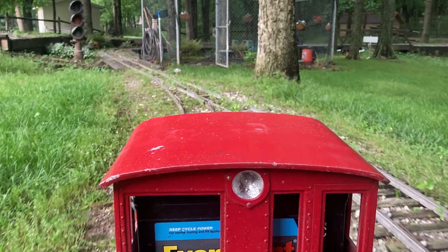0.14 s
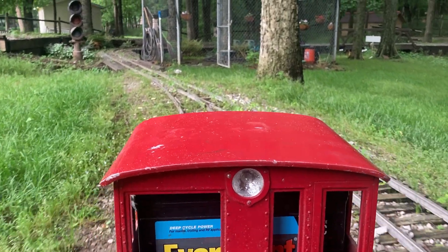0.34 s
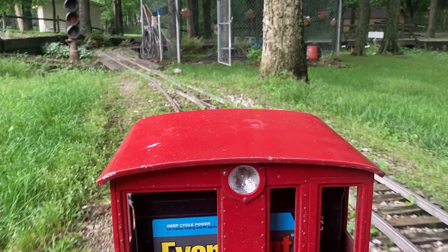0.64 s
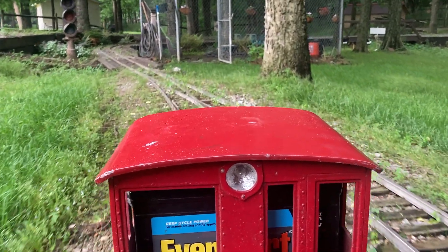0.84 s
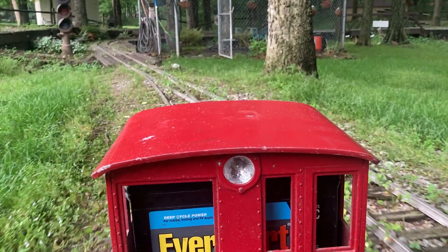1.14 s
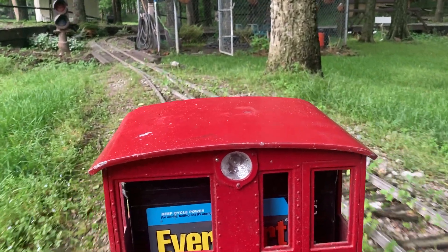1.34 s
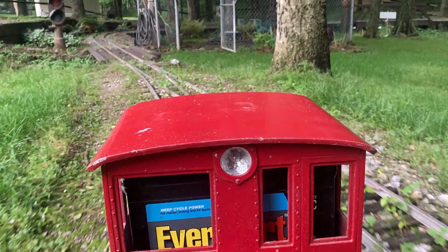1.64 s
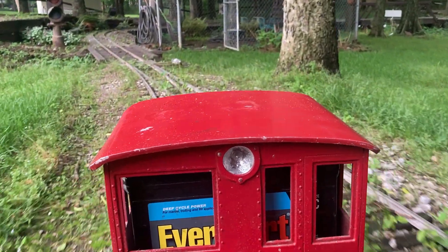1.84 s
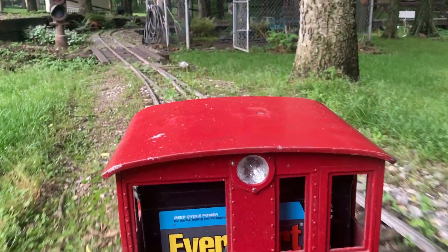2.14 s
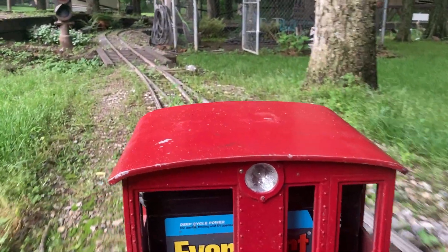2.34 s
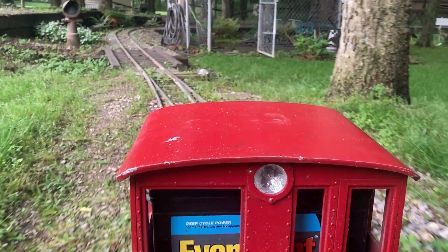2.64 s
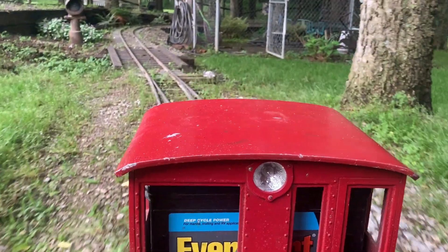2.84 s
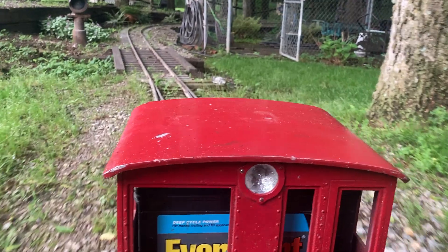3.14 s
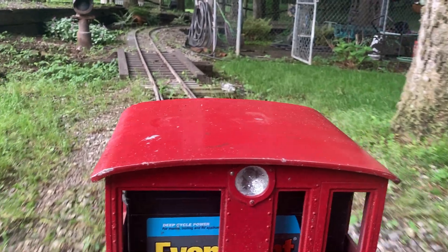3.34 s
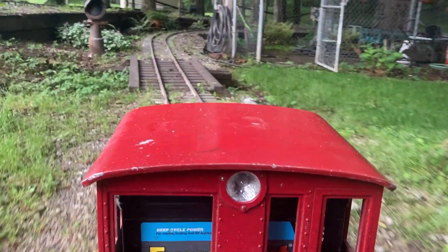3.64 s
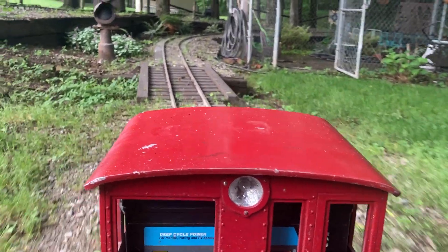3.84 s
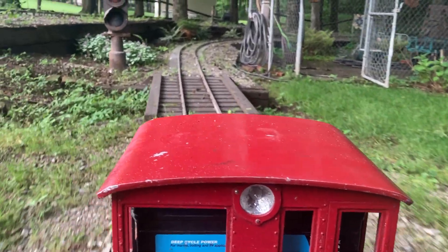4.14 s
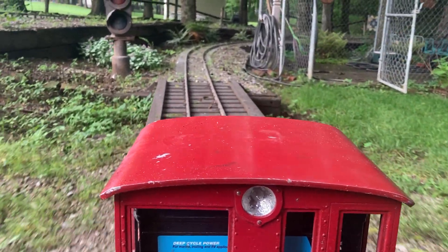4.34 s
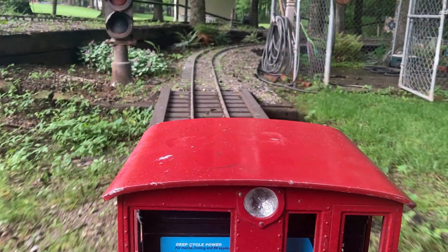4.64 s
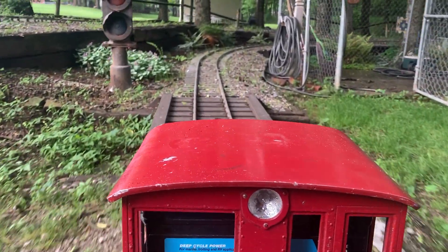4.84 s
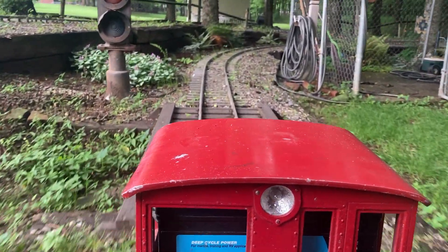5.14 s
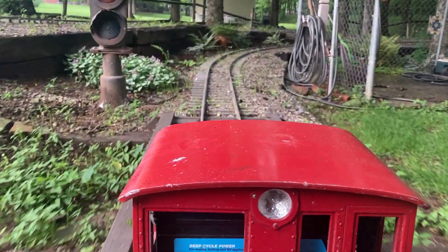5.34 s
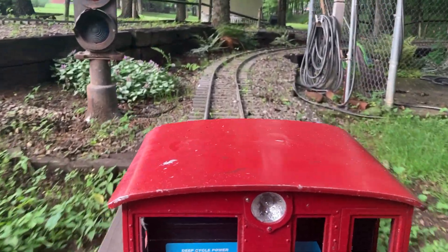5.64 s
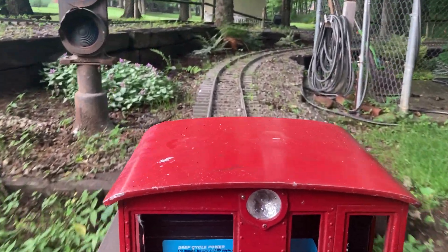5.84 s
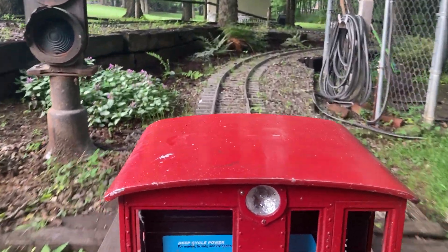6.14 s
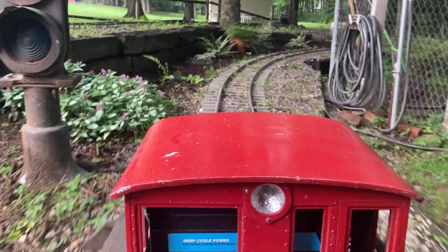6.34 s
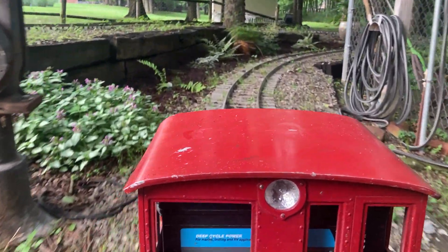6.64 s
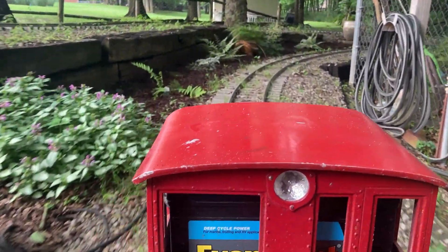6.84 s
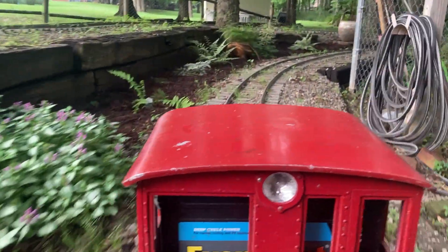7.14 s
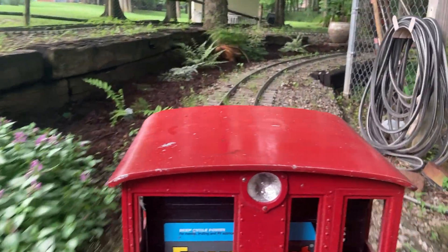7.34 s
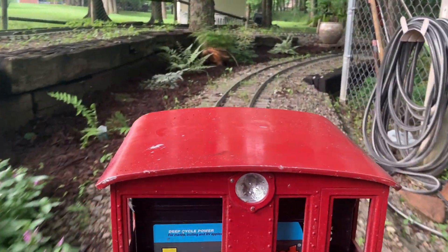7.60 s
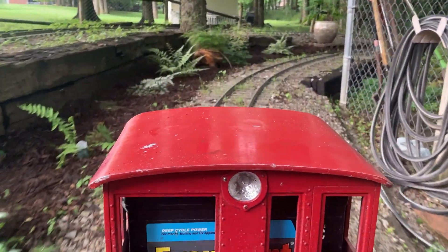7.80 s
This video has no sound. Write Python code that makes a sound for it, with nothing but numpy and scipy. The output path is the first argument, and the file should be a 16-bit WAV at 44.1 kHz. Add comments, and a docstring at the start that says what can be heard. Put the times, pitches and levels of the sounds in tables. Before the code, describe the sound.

A small electric ride-on train gathers speed with rising motor whine, gritty wheel rumble and ticking flanges, then coasts with drumming thuds over a wooden bridge.

```python
"""A rolling rumble and a rising motor whine open the scene: a small battery ride-on locomotive gathers speed.
We ride just behind its cab on narrow rails. Random wheel contacts shake the chassis, cab and rails;
sine orders of the gear mesh make the whine, until the power is cut. Noise bursts crack as grit and tap
as flanges, and decaying sines knock as loose fittings. At last the train coasts over a short wooden
bridge, whose deck drums and booms as noise swinging around the pitch of each mode."""
import sys
import numpy as np
from scipy import signal
from scipy.fft import rfft, irfft, next_fast_len
from scipy.io import wavfile
from scipy.ndimage import uniform_filter1d, minimum_filter1d, map_coordinates

SR = 44100
rng = np.random.default_rng(int(sys.argv[2]) if len(sys.argv) > 2 else 0)


def materialize(psi):
    """Save the field psi as 16-bit PCM at rate SR to the path in sys.argv[1].

    A 1-D psi becomes a single channel; in a 2-D psi each row is a channel.
    """
    bounded = np.clip(np.atleast_2d(psi).T, -1, 1)
    quanta = np.round(bounded * 32767).astype(np.int16)
    wavfile.write(sys.argv[1], SR, quanta)


N = 351477  # length of the scene in samples

# How the sheet-metal cab colours a sound. Each row: frequency in Hz, relative strength in dB.
CAB = [(550, -29.5), (870, -9.5), (980, 2.5), (1090, -7.5), (1250, 3.5), (1350, -0.5), (1450, -2),
       (1570, -0.5), (1690, 2), (1830, -15), (2100, -14.5), (2800, -61.5)]

POWER_OFF_S, COAST_HZ_PER_S = 4.96, 23.5  # when the motor stops; how fast the mesh rate then sinks
CRUISE_HZ = 230  # gear mesh rate at cruising speed


def rolling():
    """Rough wheels shake the chassis, rattle the cab panels and hiss on the rail."""
    # How the chassis and track colour the rumble. Each row: frequency in Hz, relative strength in dB.
    body_spectrum = [(22, -33), (62, -13), (125, -11.5), (185, -3.5), (220, 1.03), (265, -3), (320, 1.5),
                     (400, 0.24), (480, -2), (570, -11.5), (650, -7), (780, -16), (950, -21.5),
                     (1150, -75.5)]
    # How the wheel tread sounds on the rail. Each row: frequency in Hz, relative strength in dB.
    rail_spectrum = [(1200, -53), (1750, 3), (2000, 1), (2250, 4), (2550, 1.5), (3150, 0), (3800, -9.5),
                     (5000, -13), (5700, -21.5), (6650, -14.5), (7700, -22.5), (8700, -34.5), (10000, -60),
                     (12000, -58)]
    rumble_db, panels_db, hiss_db = ride()
    rattle = wobble(45)  # the load on the wheels flutters
    body_force = contacts(rate=900, spread_db=1.5, smooth=0.99)
    cab_force = contacts(rate=600, spread_db=3.5, smooth=1.0)
    rail_force = steel(contacts(rate=1100, spread_db=7.5, smooth=1.4))
    body = unit(ports(ring_through(body_force, body_spectrum)))
    cab = unit(ports(ring_through(cab_force, CAB)))
    rail = unit(ports(ring_through(rail_force, rail_spectrum)))
    return (body * amp(rumble_db + 0.76 * rattle)
            + cab * amp(panels_db + 1.5 * rattle)
            + rail * amp(hiss_db + 2.0 * rattle + 0.26 * wobble(19)))


def gears(shimmer_db=1.0, fade_s=0.051):
    """Orders of the gear mesh climb with speed, swell in each body resonance and fade when the power is cut."""
    # Body resonances that the orders climb through.
    # Each row: multiple of the mesh rate, resonance in Hz, width in Hz, level in dB.
    gear_swells = [(2, 246, 10, -26), (2, 335, 13, -23), (2, 402, 10, -32), (2, 436, 9, -26),
                   (2, 471, 20, -24.7), (3, 415, 20, -36), (3, 462, 18, -30), (3, 520, 16, -40),
                   (3, 585, 16, -36), (4, 650, 12, -27.5), (6, 1005, 24, -45), (7, 1015, 20, -43.5)]
    mesh_hz = speed()
    uneven_hz = mesh_hz * (1 + .0015 * wobble(22))
    phase = 2 * np.pi * np.cumsum(uneven_hz) / SR
    load_db = 1.7 * (mesh_hz / CRUISE_HZ) ** 2 * wobble(9)  # the level wavers more at speed
    whine = 0
    for k, hz, width, db in gear_swells:
        swell = 1 / (1 + ((k * mesh_hz - hz) / width) ** 2)
        level = amp(db + load_db + shimmer_db * wobble(25))
        whine = whine + swell * level * np.sqrt(2) * np.sin(k * phase)
    fade = np.exp(-since(POWER_OFF_S) / fade_s)
    return ports(np.array([whine * fade, np.zeros(N)]))


def bridge(width_hz=75, boom_width_hz=60):
    """The timber deck drums in a main mode that sags under each load, and booms in its hollow ones."""
    # Engine and cars load the deck in turn.
    # Each row: start in seconds, length in seconds, starting level in dB, swell in dB per second.
    loads = [(5.761, 0.76, -20, 7), (6.596, 0.4, -17, 1), (7.03, .94, -19, -10)]
    # The hollow span booms as a truck crosses a beam.
    # Each row: start in seconds, pitch in Hz, level in dB, time to fall by 60 dB in seconds.
    booms = [(5.982, 635, -27, 1.7), (6.17, 632.7, -21.5, 2.9), (6.521, 235, -16.5, 1.7),
             (6.68, 644.6, -19.5, 0.8), (6.78, 537.5, -22, .7), (7.19, 682, -23.5, 0.45),
             (7.229, 233.6, -24, 0.55)]
    load_attack_s, load_release_s, boom_attack_s = 0.074, 0.1, 0.04
    deck_hz, sag_hz_per_s = 395.4, 85  # the main mode sinks as a load moves toward mid-span
    drumming, booming = 0, 0
    for s, length, db, swell_db in loads:
        on_deck_s = np.minimum(since(s), length)
        load = amp(db + swell_db * on_deck_s) * gate(s, length, load_attack_s, load_release_s)
        drumming = drumming + load * resonance(deck_hz - sag_hz_per_s * on_deck_s, width_hz)
    for s, hz, db, t60 in booms:
        rise = np.minimum(since(s) / boom_attack_s, 1)
        envelope = amp(db - 60 * since(s + boom_attack_s) / t60) * rise
        booming = booming + envelope * resonance(np.full(N, hz), boom_width_hz)
    return ports(np.array([drumming + booming, np.zeros(N)]))


def joints(swell_s=0.0099):
    """A wheel dropping into a rail gap or onto a bridge tie gives one dull, rounded thud."""
    # Each row: start in seconds, level in dB, pitch in Hz.
    drops = [(.317, -16, 360), (2.823, -9, 340), (3.534, -11, 350), (5.989, -8, 365), (6.069, -7.5, 370),
             (6.103, -8, 405), (6.206, -3.5, 355), (6.246, -5.5, 355), (6.323, -4, 350), (6.398, -3.5, 320),
             (6.482, -9, 320), (6.52, -7, 370), (6.575, -12, 440), (6.687, -9.5, 405), (6.722, -10, 415),
             (6.76, -7, 420), (6.8, -11, 430), (6.836, -6.5, 320), (6.874, -8, 390), (6.895, -4.5, 360),
             (6.943, -5.5, 380), (6.985, -6, 395), (7.072, -15, 390), (7.156, -13, 350)]
    out, t = np.zeros((2, N)), np.arange(SR // 8) / SR
    envelope = (t / swell_s * np.exp(1 - t / swell_s)) ** 2  # rises to 1 at swell_s, then dies away
    for s, db, hz in drops:
        add(out[0], s, amp(db) * envelope * np.sin(2 * np.pi * hz * t))
    return ports(out)


def knocks(ping_db=1):
    """A loose fitting knocks to and fro as the train rocks, in changing modes; pebbles ping off the wheels."""
    # Each row: start in seconds, level in dB, then tints in dB for the lowest three modes, the fourth,
    # the next two and the top two, and last the level of the crack in dB relative to the knock.
    blows = [(5.378, -22, 2, -12, -14, -15, -26), (5.3993, -21, -14, -8, 0, -14, -23),
             (5.435, -9.5, -6, 4, 9, 2, -14.5), (5.5154, -22, -4, -3, -10, 7, -26),
             (5.559, -25, -2, 0, 12, -10, -7), (5.563, -19, -2, 0, 13, -12, -10),
             (5.572, -22, 2, -12, -14, -15, -20), (6.5692, -19, -17.5, -6, 1, -15, -23),
             (6.618, -9.5, -6.5, 7, -10, 1, -25), (7.5137, -22.5, -20, -4, 1, -20, -19),
             (7.554, -17.5, -12, 2, -8, -12, -22)]
    # Modes of the loose fitting. Each row: pitch in Hz, level in dB, time to fall by 60 dB in seconds.
    fitting_modes = [(1350, 2, 0.025), (1655, 18, 0.033), (1850, 3, 0.018), (2200, -3, 0.024),
                     (2400, 2, 0.024), (2620, -6, 0.025), (4300, -9, 0.025), (8200, -25, 0.02)]
    # Pebbles hitting the wheel. Each row: start in seconds, level in dB.
    pings = [(5.738, -27.5), (7.443, -34.5)]
    # Modes heard in a ping. Each row: pitch in Hz, level in dB, time to fall by 60 dB in seconds.
    pebble_modes = [(3330, 3.5, 0.024), (3650, 0, 0.015), (8300, -17.5, 0.012), (8930, -11.5, 0.015),
                    (9650, -16.5, 0.014)]
    # Contact noise of a knock. Each row: frequency in Hz, relative strength in dB.
    crack_spectrum = [(700, -9), (1300, -1), (1800, 2), (2600, 1.5), (3400, -19), (4400, -6.5), (5600, -20),
                      (8200, -24), (12000, -39.5)]
    out, cracks = np.zeros((2, N)), np.zeros((2, N))
    for s, db, low_db, fourth_db, middle_db, high_db, crack_db in blows:
        tint_db = np.array([low_db] * 3 + [fourth_db] + [middle_db] * 2 + [high_db] * 2)
        add(out, s, amp(db + 1.5) * struck(fitting_modes, tint_db, attack_s=.0014, lag_s=.00002))
        add(cracks, s, amp(db + crack_db + 3) * burst(t60=.045))
    for s, db in pings:
        add(out, s, amp(db + ping_db) * struck(pebble_modes, 0, attack_s=0.00066, lag_s=.00001))
    return out + ports(ring_through(cracks, crack_spectrum))


def grit(again_s=0.024, again_db=-12, rate=14, small_db=-6.0):
    """Stones crack under the wheels, then crumble once more; small ones keep ticking, rate a second."""
    # The larger stones. Each row: start in seconds, level in dB.
    large = [(.3193, -35), (.3408, -35), (.7818, -33), (1.2841, -32), (1.3934, -30), (1.6648, -30),
             (1.6963, -32), (1.7655, -30), (1.955, -28), (2.2719, -29), (2.289, -28), (2.5912, -29),
             (2.6066, -26), (3.0615, -29), (3.2276, -25), (3.3487, -30), (3.6266, -30), (3.6711, -24),
             (3.762, -28), (3.8313, -26), (3.8856, -24), (3.9395, -25), (3.9658, -28), (3.9844, -27),
             (4.0232, -28), (4.2578, -27), (4.3596, -29), (4.4, -29), (4.5216, -30), (4.6233, -29),
             (4.8539, -28), (4.9133, -27), (5.1343, -23), (5.2494, -28), (5.3741, -27), (7.0226, -33),
             (7.527, -33), (7.576, -30), (7.771, -36), (7.9186, -28)]
    # How crushed grit sounds. Each row: frequency in Hz, relative strength in dB.
    stone_spectrum = [(900, -29.5), (1600, -1.5), (2300, 11), (3300, 2), (5000, -7), (5700, -17.5),
                      (6800, -12), (8500, -27), (11000, -50.5)]
    force, hiss_db = np.zeros((2, N)), ride()[2]
    small = []
    for place, size in rng.random((round(rate * N / SR), 2)):
        level_db = hiss_db[int(place * N)] + small_db + 4 * size  # ticks follow the rail hiss
        small.append((place * N / SR, level_db))
    for s, db in list(large) + small:
        add(force, s, amp(db + 1.5) * snap())
        add(force, s + again_s * (.5 + rng.random()), amp(db + again_db) * snap())
    return ports(ring_through(steel(force), stone_spectrum))


def flanges(gap_s=.014, uneven=.5, size_db=2.0, graze_db=-58):
    """The flanges chatter on the rail side in uneven taps that ring the wheel; the hardest stand out."""
    # Scrapes along the rail side. Each row: start in seconds, length in seconds, level in dB.
    scrapes = [(.58, .85, -57), (1.51, .54, -43.5), (2.9, 2.5, -50), (7.46, .5, -54)]
    # Single hard taps on the rail. Each row: start in seconds, level in dB.
    hard_taps = [(.4316, -32), (1.0133, -36), (1.12, -29), (1.4118, -31), (1.5126, -28), (1.5255, -31),
                 (1.5889, -31), (1.6179, -32), (1.7266, -31), (1.7655, -28), (1.812, -33), (1.8464, -30),
                 (1.8758, -30), (1.9541, -28), (1.9781, -32), (2.0055, -31), (2.039, -33), (2.0709, -32),
                 (2.0843, -28), (2.1472, -33), (2.1901, -31), (7.919, -24)]
    # A steel wheel struck at its flange. Each row: frequency in Hz, relative strength in dB.
    wheel_spectrum = [(1300, -8.5), (1900, 6.5), (2200, 12), (2550, 5.5), (3000, 2), (3350, -1), (3700, -3),
                      (4500, -21.5), (5700, -20.5), (7000, -20), (10000, -45)]
    attack_s, release_s = 0.017, 0.08
    pressure = amp(graze_db)  # a light graze never stops
    for s, length, db in scrapes:
        pressure = pressure + amp(db) * gate(s, length, attack_s, release_s)
    chatter, taps = np.zeros((2, N)), np.zeros((2, N))
    gaps, sizes = np.clip(rng.standard_normal(size=(900, 2)), -2, 2).T
    times = np.cumsum(gap_s * np.exp(uneven * gaps))
    for s, size in zip(times, sizes):
        add(chatter, s, amp(size_db * size) * snap())
    for s, db in hard_taps:
        add(taps, s, amp(db) * snap())
    scraping = unit(ports(ring_through(steel(chatter), wheel_spectrum)))
    return pressure * scraping + ports(ring_through(steel(taps), wheel_spectrum))


def jolts():
    """A bump in the track throws the cab panels against their frame."""
    # Each row: start in seconds, level in dB.
    bumps = [(.321, -33), (3.319, -31.5), (3.535, -29.5), (4.024, -29), (4.518, -27.5), (4.887, -25.5),
             (4.92, -26.5), (5.135, -27), (5.826, -31), (7.85, -36)]
    force = np.zeros((2, N))
    for s, db in bumps:
        add(force, s, amp(db) * snap())
    return ports(ring_through(force, CAB))


def sand(attack_s=0.02, release_s=0.016):
    """Each patch of sand on the rail is ground into a bright, dense crackle."""
    # Each row: start in seconds, length in seconds, level in dB.
    sand_patches = [(1.52, 0.06, -54.5), (2.55, .1, -53), (4.35, 0.08, -44.5), (5.115, 0.03, -45.5),
                    (5.235, .025, -45.5), (5.35, 0.03, -48), (5.78, .55, -51.5), (6.34, .1, -43.5),
                    (6.45, 0.097, -48.5), (7.47, 0.021, -43.5), (7.52, .065, -48.5)]
    # How fine ground sand sounds. Each row: frequency in Hz, relative strength in dB.
    sand_spectrum = [(1800, -28), (3000, 2.5), (4200, 1), (5100, -0.5), (5700, -12), (6900, -4.5),
                     (8000, -12.5), (9000, -25.5), (11000, -45)]
    patches = sum(amp(db) * gate(s, length, attack_s, release_s) for s, length, db in sand_patches)
    crackle = ring_through(contacts(rate=2200, spread_db=6, smooth=0.56), sand_spectrum)
    return patches * unit(ports(crackle))


def speed():
    """Gear mesh rate in Hz: it climbs under power and sinks while coasting."""
    # The climb under power. Each row: time in seconds, mesh rate in Hz.
    climb = [(0, 114), (.2, 123), (.45, 134.5), (.75, 147.7), (1.0, 156.3), (1.15, 159.3), (1.35, 163.2),
             (1.55, 170.3), (2.2, 195), (2.95, 217), (3.15, 222.3), (3.9, 231.5), (4.1, 233.7),
             (4.35, 234.9), (4.9, 240.7)]
    return curves(climb)[0] - COAST_HZ_PER_S * since(POWER_OFF_S)


def ride():
    """Levels in dB of rumble, cab rattle and rail hiss: all grow with speed and change with the rail."""
    # Rougher or smoother stretches of rail.
    # Each row: start in seconds, length in seconds, extra rumble in dB, extra hiss in dB.
    stretches = [(0.352, 1.1, -2, -1), (1.482, 0.46, -.5, 1), (2.07, 0.32, -1, -0.5), (2.787, 2.68, 1.6, 3),
                 (3.397, 0.28, 2, 0.3), (5.766, .73, 1, 7), (6.332, 0.13, 1.5, 2), (6.896, 0.51, -3, -2.5),
                 (7.435, 0.47, -1.5, 0)]
    edge_s = 0.051  # time to run onto or off a stretch
    panel_share = 0.56  # share of the extra hiss, in dB, that the cab takes up
    doublings = np.log2(speed() / CRUISE_HZ)
    bumpy, coarse = sum(np.outer(extra_db, gate(s, length, edge_s, edge_s))
                        for s, length, *extra_db in stretches)
    # level at cruising speed, growth per doubling of speed, extra from the rail
    return (-20 + 4 * doublings + bumpy,
            -35 + 5 * doublings + panel_share * coarse,
            -45 + 9 * doublings + coarse)


def contacts(rate, spread_db, smooth):
    """Force of a rough tread: tiny random impacts, rate a second, on top of even friction noise."""
    hits = rng.random(N) < rate / SR
    sizes = amp(spread_db * np.minimum(rng.exponential(size=N), 3))
    impacts = hits * sizes * rng.uniform(-1.03, 1, (2, N))
    return unit(impacts) + smooth * unit(rng.standard_normal((2, N)))


def steel(x, count=3):
    """Wheels and rails add a brief ring of close modes, which change as the contact point travels."""
    t = np.arange(SR // 25) / SR
    tails = rng.standard_normal((count, len(t))) * amp(-60 * t / .035)  # noise tails, 60 dB down in 35 ms
    shares = np.array([wobble(5) for _ in tails])
    shares /= np.linalg.norm(shares, axis=0)
    ringing = 0
    for share, tail in zip(shares, tails):
        ring = signal.oaconvolve(x, tail[None] / np.linalg.norm(tail), axes=1)[:, :N]
        ringing = ringing + share * ring
    return .85 * x + .5 * ringing


def resonance(centre_hz, width_hz):
    """A broad mode shaken at random, rms 1; heavy timber gives less as it swings wider."""
    # How well the timber radiates. Each row: frequency in Hz, relative strength in dB.
    deck_spectrum = [(60, -44.5), (150, -24), (230, -8.5), (340, 2), (450, 0.5), (600, 3), (800, -3.5),
                     (1100, -32), (1800, -48)]
    noise = rng.standard_normal((2, N))
    sway = filtered(noise, lambda hz: 1 / (1 + 1j * hz / width_hz) ** 1.61)
    swing = np.tanh(0.4 * sway / sway.std())
    phase = 2 * np.pi * np.cumsum(centre_hz) / SR
    boom = swing[0] * np.cos(phase) + swing[1] * np.sin(phase)
    return unit(filtered(boom, lambda hz: amp(along(deck_spectrum, hz)[0])))


def struck(modes, tint_db, attack_s, lag_s):
    """One blow on a small part, its modes tinted; the right microphone hears it lag_s later."""
    t = np.maximum(np.arange(SR // 8) / SR - np.array([[0], [lag_s]]), 0)
    hz, db, t60 = np.transpose(modes)
    db = db + tint_db + rng.standard_normal(len(db))  # no two blows are quite alike
    ring = sum(amp(d - 60 * t / life) * np.sin(2 * np.pi * f * t) for f, d, life in zip(hz, db, t60))
    ring = ring * (1 - np.exp(-(t / attack_s) ** 2))
    return ring / np.abs(ring.mean(0)).max()


def burst(t60):
    """A short crunch of contact force on two unrelated channels, falling 60 dB in t60 seconds."""
    t = np.arange(SR // 8) / SR
    return amp(-60 * t / t60) * rng.standard_normal((2, len(t)))


def snap():
    """A hard contact: a sharp, short break on top of a weaker, longer crunch."""
    return 1.5 * burst(t60=.011) + .6 * burst(t60=.05)


def ring_through(x, spectrum, size=4096):
    """Pass x through a body with this spectrum, which answers a blow at once and never ahead of it."""
    gain_db, = along(spectrum, np.fft.rfftfreq(size, 1 / SR))
    # folding the cepstrum (the spectrum of the log gain) gives the minimum-phase response
    cepstrum = irfft(np.log(amp(gain_db)))
    cepstrum[1:size // 2] *= 2
    cepstrum[size // 2 + 1:] = 0
    response = irfft(np.exp(rfft(cepstrum)))
    return signal.fftconvolve(x, response[None] / np.linalg.norm(response), axes=1)[:, :N]


def ports(pair):
    """Two unrelated signals become left and right microphones, partly alike and out of phase."""
    # Each row: frequency in Hz, likeness from 0 to 1, lead of the left in radians, left over right in dB.
    port_table = [(60, .58, -5.7, -3.5), (150, .9, -2.95, -7), (240, .94, -1.35, 0), (315, .99, -.35, 1.4),
                  (385, .99, .25, -.9), (470, .95, .6, -.2), (580, .83, .7, 0), (640, .7, -1, 1.6),
                  (750, .97, -.3, .7), (1000, .98, .95, 0), (1200, .93, 1.85, .5), (1620, .9, .68, .8),
                  (1870, .3, 2.6, -3), (2200, .9, 3.94, -2.5), (2450, .8, 4.1, -1), (2650, .3, 4.27, -.3),
                  (3300, .31, 6.41, 3.2), (4500, .25, 6.47, .6), (6700, .3, 5.56, -3.1)]

    def half(hz, sign):
        """How both signals reach one side: sign 1 is left, -1 is right."""
        alike, lead, tilt_db = along(port_table, hz)
        turn = np.arccos(np.clip(alike, 0, 1)) / 2
        mix = np.array([np.cos(turn), sign * np.sin(turn)])
        return mix * np.exp(sign * .5j * lead) * amp(sign * tilt_db / 2)
    return np.array([filtered(pair, lambda hz: half(hz, sign)).sum(0) for sign in (1, -1)])


def amp(db):
    """Decibels to gain."""
    return 10 ** (np.asarray(db) / 20)


def unit(x):
    """Scale to rms 1; a stereo pair is scaled by its centre."""
    return x / np.sqrt(np.mean(np.atleast_2d(x).mean(0) ** 2) + 1e-20)


def along(points, hz):
    """Each column of a frequency table, read on a log axis."""
    f, *cols = np.transpose(points)
    return [np.interp(np.log(hz + 1), np.log(f), c) for c in cols]


def curves(rows):
    """One value per sample for each column after the time."""
    s, *cols = np.transpose(rows)
    return [np.interp(np.arange(N) / SR, s, c) for c in cols]


def wobble(rate):
    """A smooth random curve, rate knots a second."""
    knots = rng.standard_normal(int(N * rate / SR) + 4)
    return map_coordinates(knots, [np.arange(N) * rate / SR])


def filtered(x, response):
    """Pass x through a filter given as a complex response of frequency."""
    size = next_fast_len(N + SR // 2)
    return irfft(rfft(x, size) * response(np.fft.rfftfreq(size, 1 / SR)), size)[..., :N]


def since(s):
    """Seconds elapsed since time s, zero before it."""
    return np.maximum(np.arange(N) / SR - s, 0)


def gate(s, length, attack, release):
    """Attack, hold and release, from 0 to 1 and back."""
    return np.minimum(since(s) / attack, 1) * np.maximum(1 - since(s + length) / release, 0)


def add(track, s, sound):
    """Mix a sound into a track from time s."""
    part = track[..., max(round(s * SR), 0):][..., :sound.shape[-1]]
    part += sound[..., :part.shape[-1]]


def scene():
    """All sources ride with the train, in the open air: they simply add up, without echo."""
    return rolling() + gears() + bridge() + joints() + knocks() + grit() + flanges() + jolts() + sand()


def record(dry, top_hz=12000):
    """A limiter turns the peaks down smoothly, and nothing is kept from top_hz upward."""
    needed = np.minimum(1, .9 / (np.abs(dry).max(0) + 1e-9))
    gain = uniform_filter1d(minimum_filter1d(needed, size=881), size=441)  # windows of 20 and 10 ms
    return filtered(dry * gain, lambda hz: hz < top_hz)


dry = scene()
out = record(dry)
materialize(out)
```